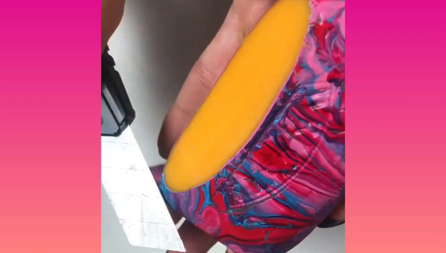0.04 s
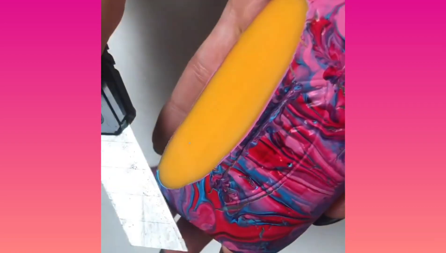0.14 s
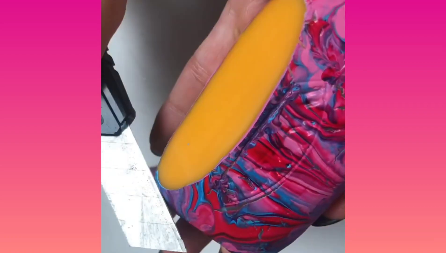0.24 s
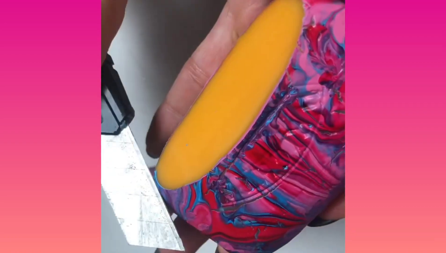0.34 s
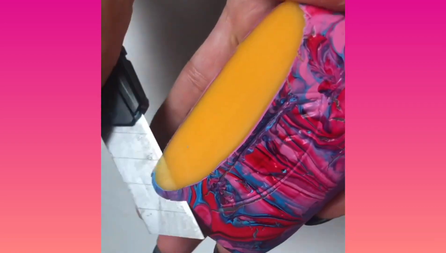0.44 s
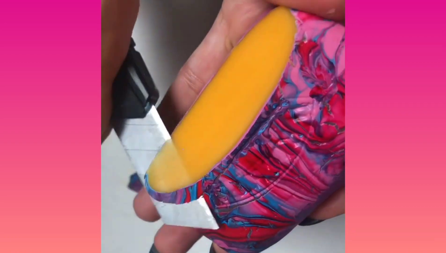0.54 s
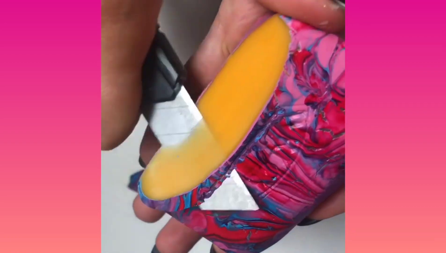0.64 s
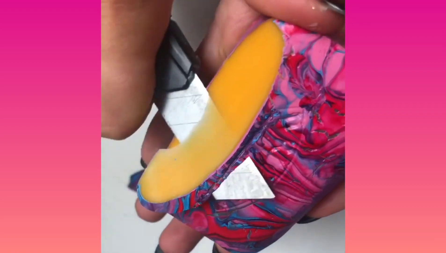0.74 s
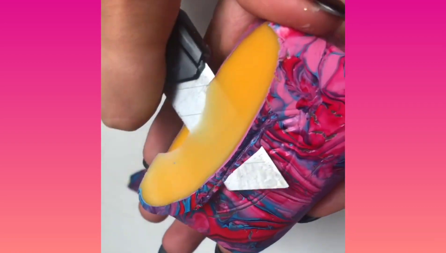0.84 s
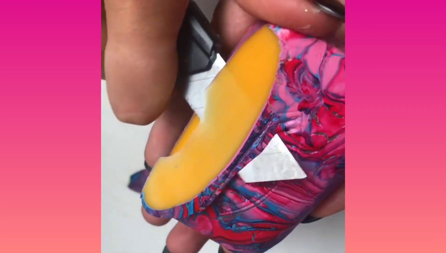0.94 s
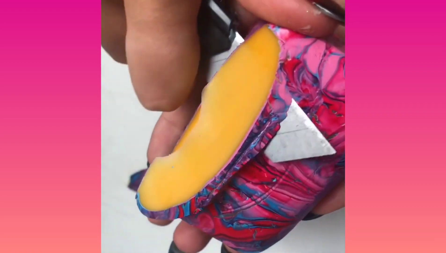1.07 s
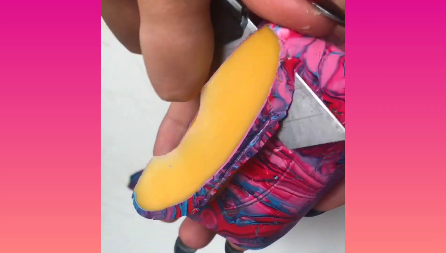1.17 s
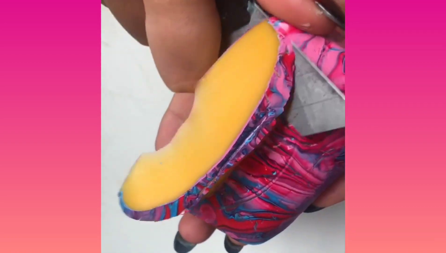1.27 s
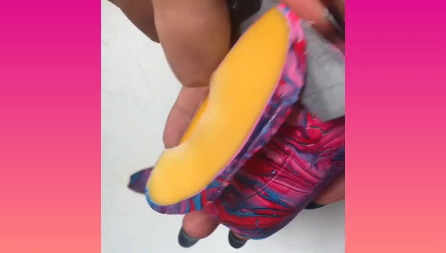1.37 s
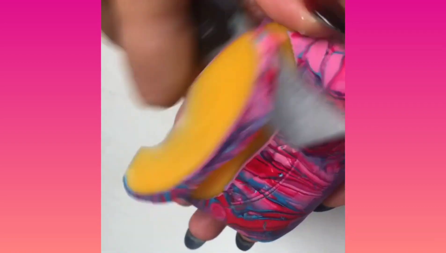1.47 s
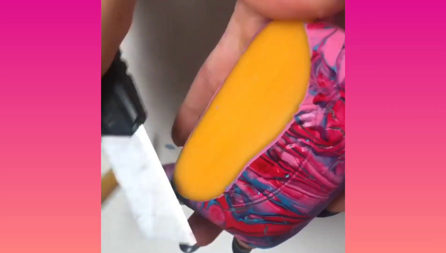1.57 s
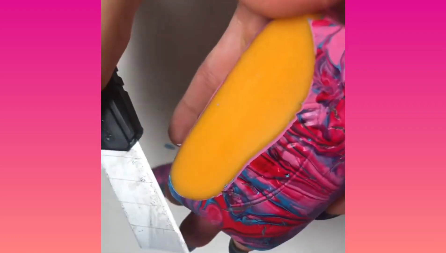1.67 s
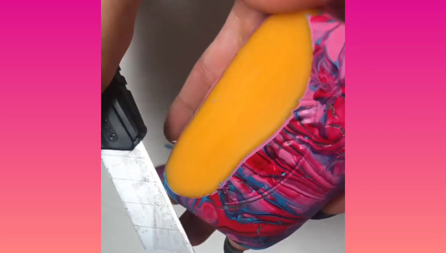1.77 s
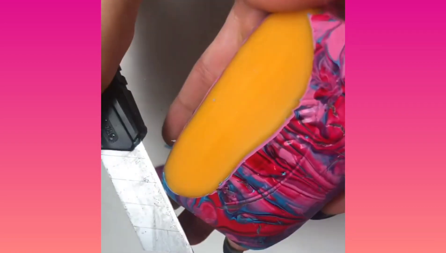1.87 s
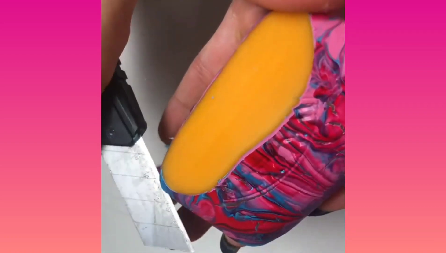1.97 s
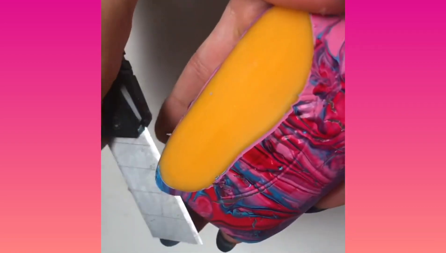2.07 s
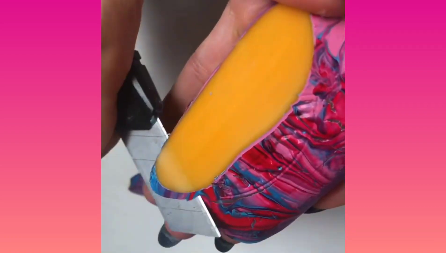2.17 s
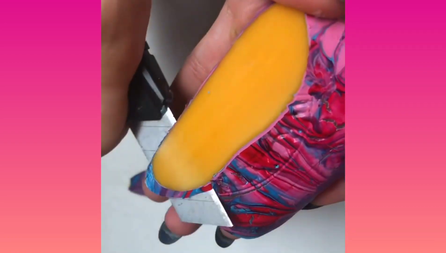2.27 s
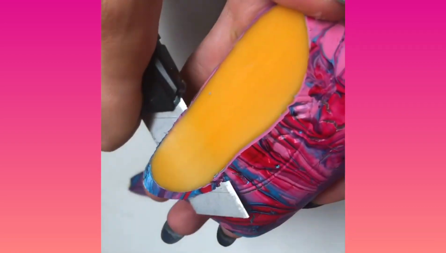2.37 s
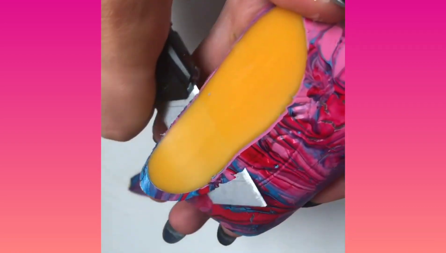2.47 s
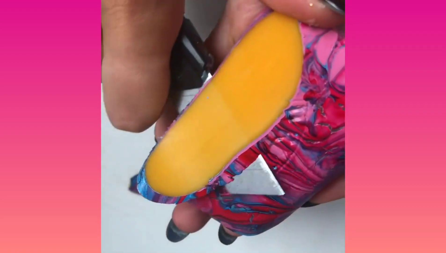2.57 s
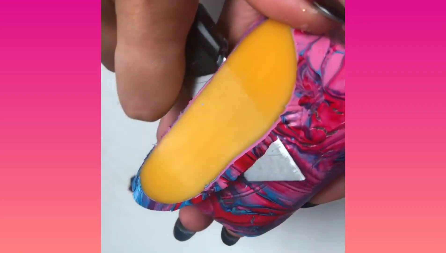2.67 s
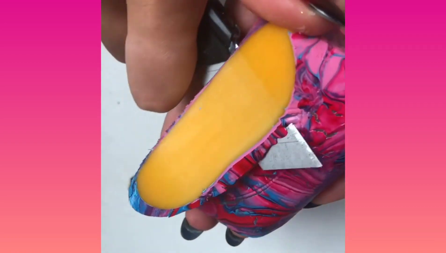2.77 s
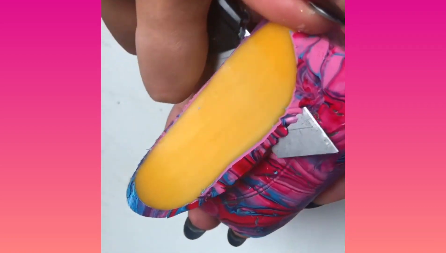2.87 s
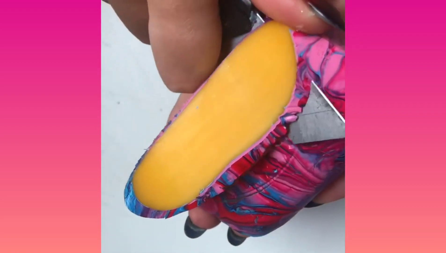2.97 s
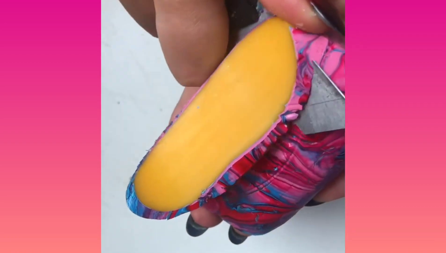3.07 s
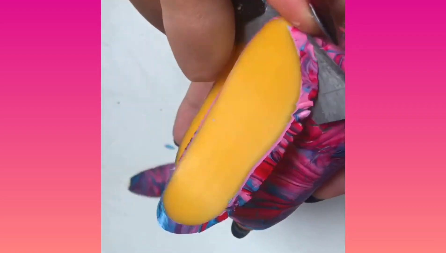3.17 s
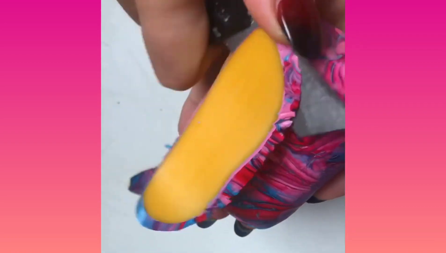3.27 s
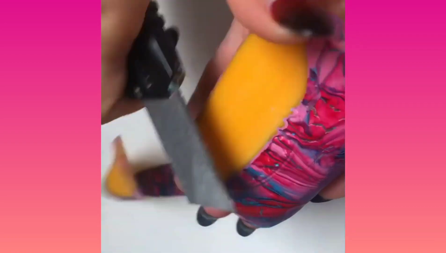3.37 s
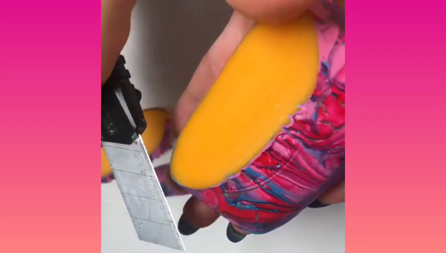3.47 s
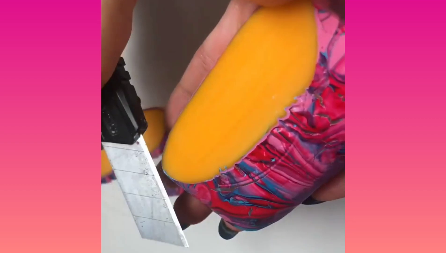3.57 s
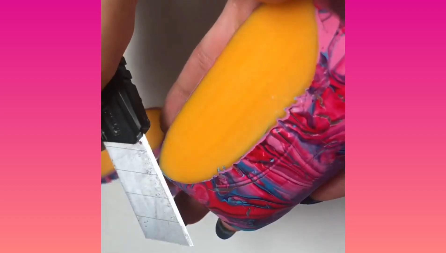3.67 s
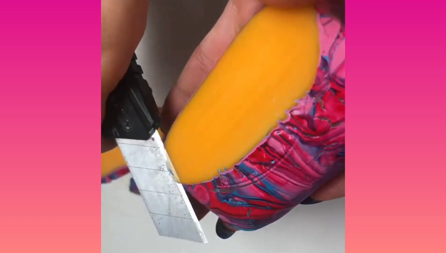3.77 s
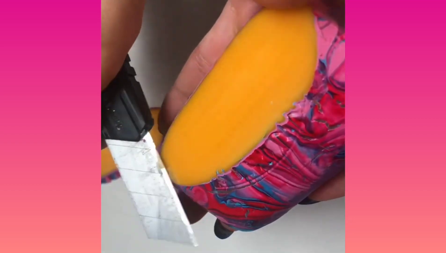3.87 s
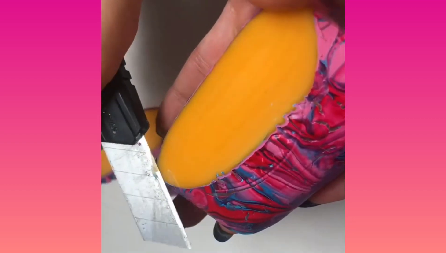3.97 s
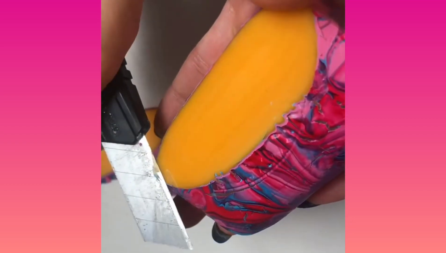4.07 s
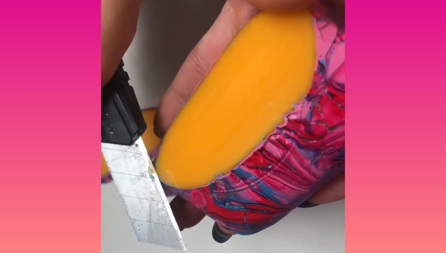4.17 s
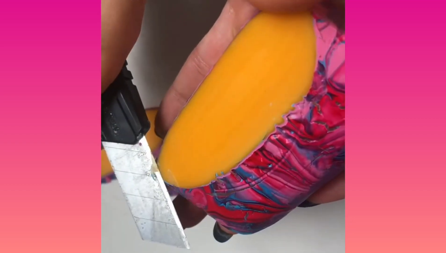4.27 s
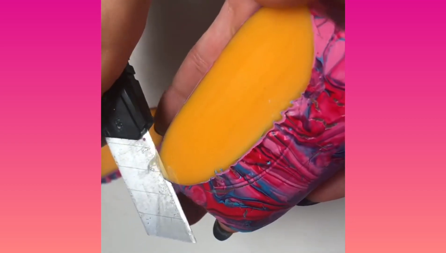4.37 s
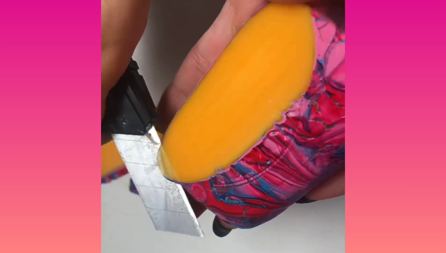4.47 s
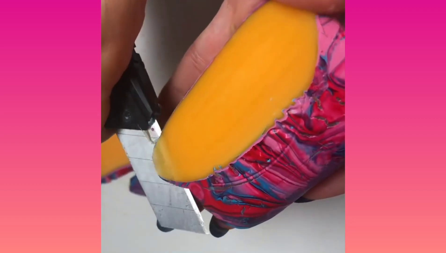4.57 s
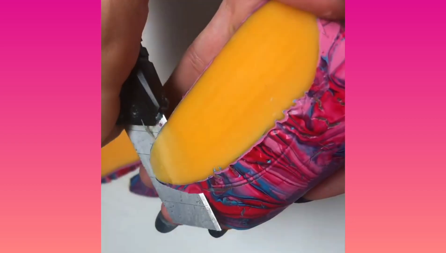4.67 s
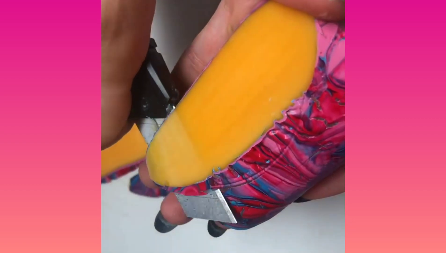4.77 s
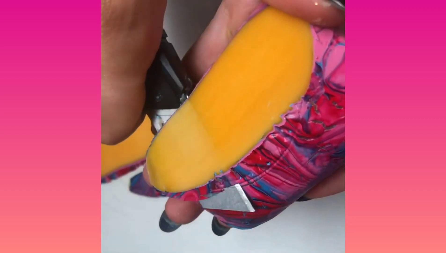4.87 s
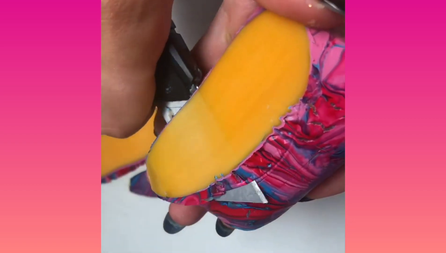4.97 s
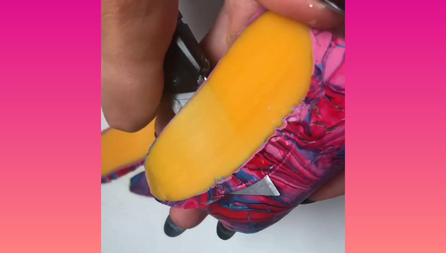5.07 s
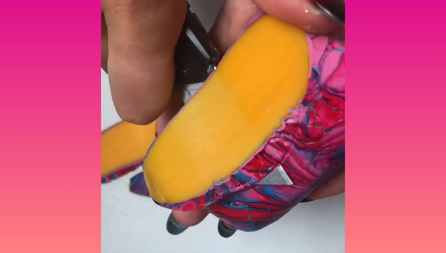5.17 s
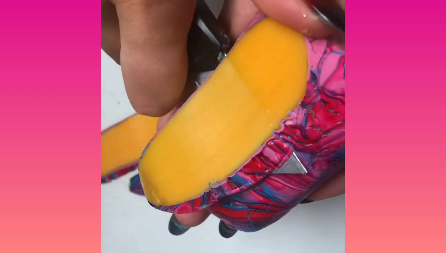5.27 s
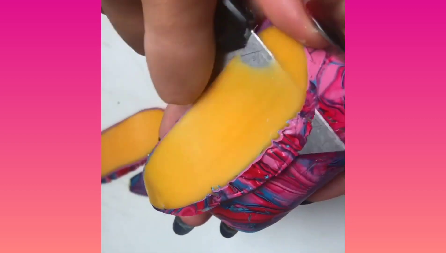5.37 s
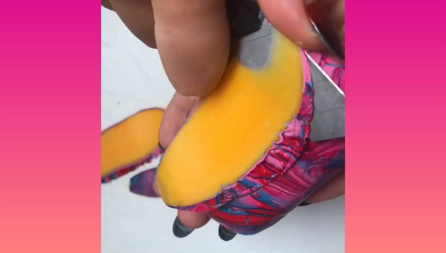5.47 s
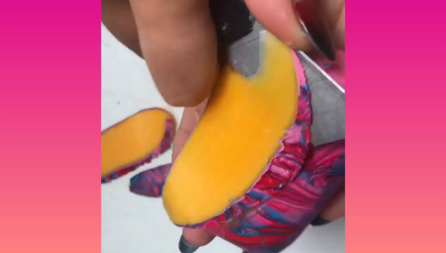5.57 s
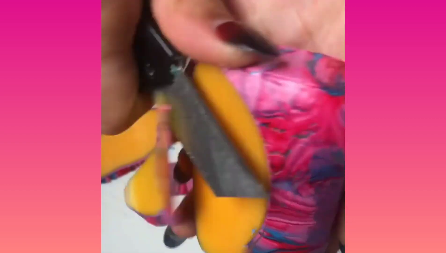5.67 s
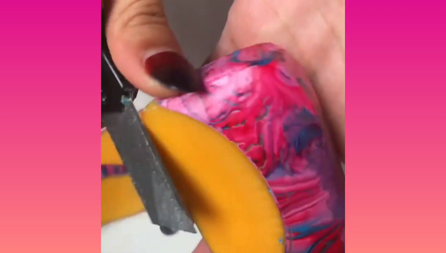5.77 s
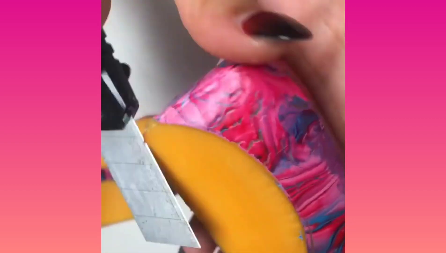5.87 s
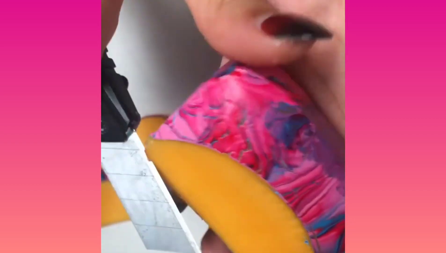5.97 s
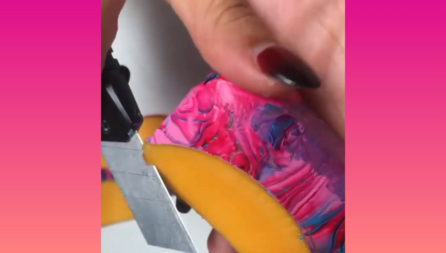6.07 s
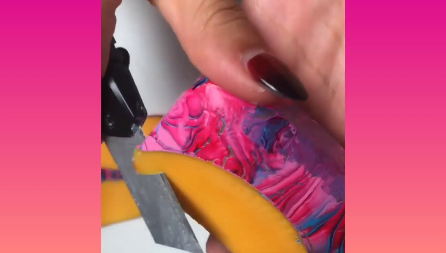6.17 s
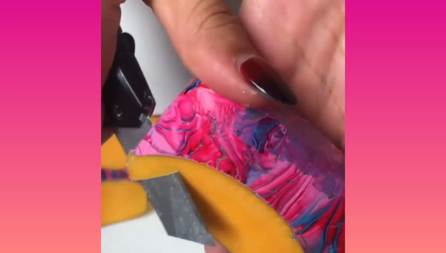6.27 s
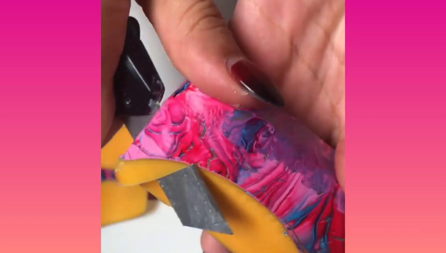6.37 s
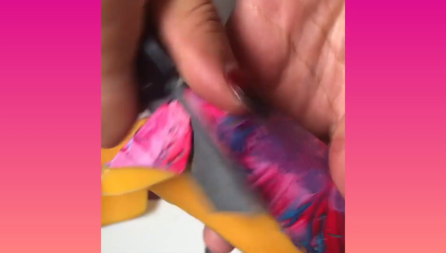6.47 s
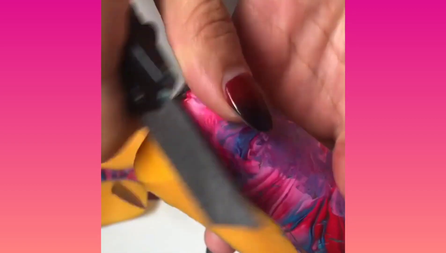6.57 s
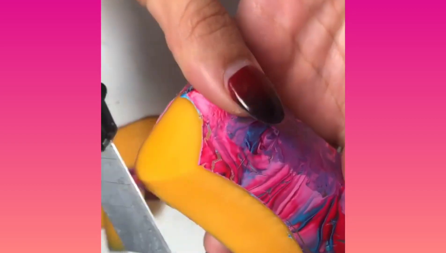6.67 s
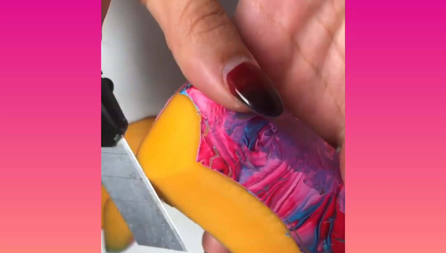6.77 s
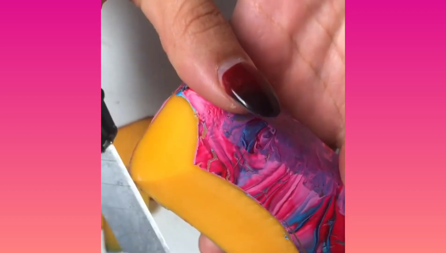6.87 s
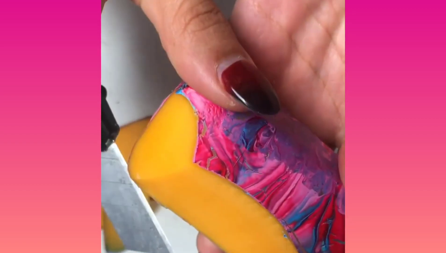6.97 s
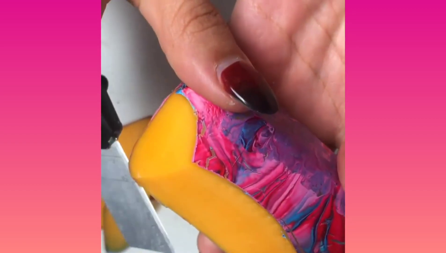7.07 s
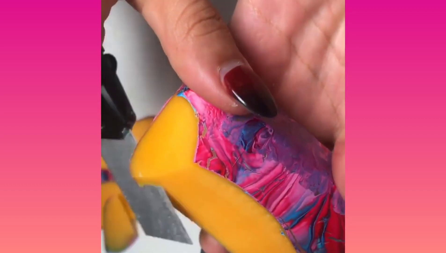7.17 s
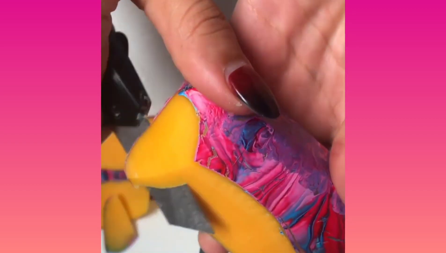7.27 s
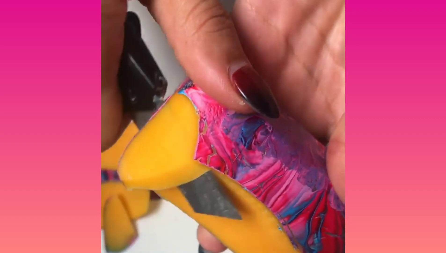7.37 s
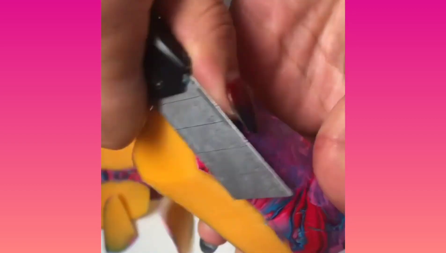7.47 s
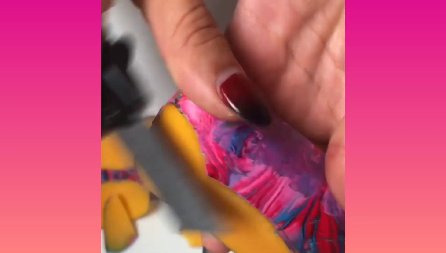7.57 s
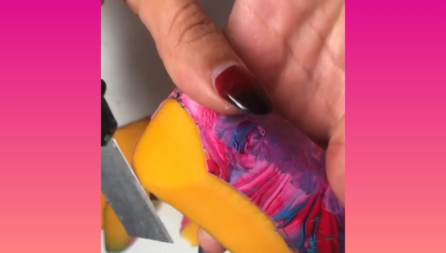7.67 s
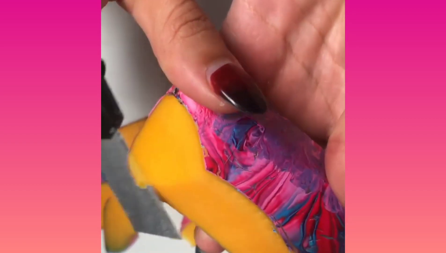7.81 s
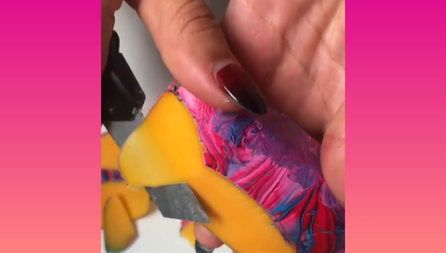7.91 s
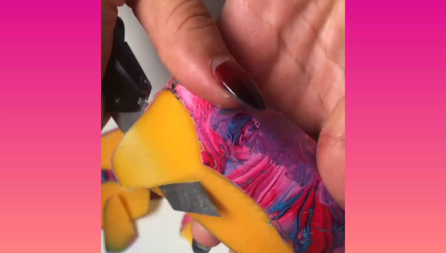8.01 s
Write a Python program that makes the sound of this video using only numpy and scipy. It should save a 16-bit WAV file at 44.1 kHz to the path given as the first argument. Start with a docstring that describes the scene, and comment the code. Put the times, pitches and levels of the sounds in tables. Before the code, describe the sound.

Crisp soap carving heard by a close microphone with slightly dulled top treble. Barely audible shaving hisses lead to sharp brittle cracks, each soon followed by a woody knock or muffled thump and a tiny clatter on the table. The pace is uneven, with near-silent gaps holding only soft air noise, a low wavering hum and rumble.

```python
"""The faint hiss of a snap-off blade shaving soap, close to the microphone in a quiet room.
The hiss is noise from the slipping edge, louder and crumbly where it bites; bursts of tiny breaks make the
soap crack as slices come free. The pieces drop and bounce on the table top, whose bending waves answer
with short falling thuds, and rock in soft bumps. Behind: rumble, a wavering hum, a fading wash and air."""
import sys
import numpy as np
from scipy import signal
from scipy.fft import rfft, irfft, next_fast_len
from scipy.io import wavfile
from scipy.ndimage import uniform_filter1d, map_coordinates

SR = 44100
rng = np.random.default_rng(int(sys.argv[2]) if len(sys.argv) > 2 else 0)


def master_out(mix):
    """Clip the mix to full scale and print it as 16-bit PCM to the path in sys.argv[1]."""
    frames = np.transpose(np.atleast_2d(mix))
    ceiling = np.clip(frames, -1, 1)
    pcm = np.round(ceiling * 32767).astype(np.int16)
    wavfile.write(sys.argv[1], SR, pcm)


N = 354563
TIME = np.arange(N) / SR  # s
HIT = 4096  # samples in one contact
HIT_HZ = np.fft.rfftfreq(HIT, 1 / SR)

# long strokes of the blade through the bar: start_s, end_s, scrape_db
STROKES = [(0.512, 1.34, -75.5), (2.201, 3.25, -77.5), (4.7, 5.7, -80.5)]
# the blade bites harder: peak_s, fall_s (time to fall 10 dB; 0 is silent), scrape_db, crumbling_db
BITES = [(0.525, 0.02, -58, -70), (0.757, 0.03, -55, -58), (1.18, 0.07, -66, -92), (1.44, 0.1, -73.5, -83),
         (1.522, 0.0242, -63, -68), (1.63, 0.05, -67.5, -69), (2.32, 0.18, -73.5, -79),
         (2.69, 0.36, -72.5, -74.5), (3.471, 0.02, -56.5, -58), (3.94, 0.15, -74, -82.5),
         (4.991, 0.1, -70, -69), (5.47, 0.2, -67.5, -72), (5.549, 0.0343, -50, -65),
         (5.635, 0.0868, -61, -68.5), (5.81, 0.27, -72.5, -71), (6.642, 0.09, -62, -72),
         (7.45, 0.16, -74.5, -68.5), (7.585, 0, -51.5, -74), (8.015, 0.04, -69.5, -64)]
# spectrum of crumbs crackling off the edge: pitch_hz, relative level_db (per Hz)
CRUMBLE = [(600, -10.5), (1800, -4), (5000, -5), (7300, 1), (9200, 3), (10300, -2), (12000, -8.5)]
STROKE_EDGE_S = 0.053  # the blade eases in and out
ENTRY_HZ, EXIT_HZ = 3860, 4300  # the scrape's resonance climbs as the slice comes loose
CLIMB_CURVE = 0.45  # below 1: it climbs fastest early in the stroke


def shaving():
    """The edge sticks and slips through the wax; where it bites, fine crumbs crackle off it."""
    catches = np.abs(wobble(260))  # brief catches of the edge make the hiss grainy
    grip = unit(amp(5 * catches + 1.6 * wobble(60) + 0.8 * wobble(14)))
    scraping, crumbling, depth = np.zeros((3, N))
    for start, end, scrape_db in STROKES:
        inside = np.clip(np.minimum(TIME - start, end - TIME) / STROKE_EDGE_S, 0, 1)
        scraping += amp(scrape_db) * inside
        depth = np.where(inside > 0, (TIME - start) / (end - start), depth)
    for peak, fall, scrape_db, crumbling_db in BITES:
        bite = swell(peak, fall)
        scraping = np.hypot(scraping, amp(scrape_db) * bite)
        crumbling = np.hypot(crumbling, amp(crumbling_db) * bite)
    # the climb is a crossfade between two resonances
    depth = np.clip(depth, 0, 1) ** CLIMB_CURVE
    hiss = np.sqrt(1 - depth) * scrape(ENTRY_HZ) + np.sqrt(depth) * scrape(EXIT_HZ)
    spiky_noise = rng.standard_normal(N) * amp(6.0 * rng.standard_normal(N))
    crumbs = unit(coloured(spiky_noise, CRUMBLE))
    return grip * (scraping * hiss + crumbling * crumbs)


# spectrum of the scrape with its resonance at 4300 Hz: pitch_hz, relative level_db (per Hz)
SCRAPE = [(1500, -15), (2500, -11.5), (3300, -14.5), (3800, -5.5), (4300, -1), (4800, -4.5), (5500, -16),
          (6200, -13.5), (7200, -18.5), (11000, -20)]


def scrape(resonance_hz):
    """Slips of the edge, heard through the resonance of the slice."""
    slips = rng.standard_normal(N) * amp(3.39 * rng.standard_normal(N))
    shifted = [(hz * resonance_hz / 4300, db) for hz, db in SCRAPE]
    return unit(coloured(slips, shifted))


# soap cracking at the blade: start_s, snap_db (relative), body_db (over the snap), build_up_s
CRACKS = [(0.299, -26.5, 5.5, 0.0029), (0.509, -16.5, -5.5, 0.0028), (1.1318, -15, -16, 0.00085),
          (1.5127, -8.5, -14, 0.0032), (1.616, -19, -3.5, 0.0043), (2.584, -23.5, -21, 0.0015),
          (2.825, -23, -12, .001), (2.978, -15, -12.5, 0.00097), (3.293, -7.5, -14.5, 0.00081),
          (3.443, -10.5, -2.5, 0.00087), (3.4592, 2, -10.5, .0016), (3.488, -5, 1.5, 0.0013),
          (3.829, -13, -6, 0.006), (4.2956, -22, -2, .0011), (4.3832, -24, -9, .0012),
          (5.526, -9.5, -3, .0015), (5.752, -22.5, -6, .001), (5.768, -21, -3.5, 0.00077),
          (5.806, -18, 0, 0.012), (5.848, -21, -4.5, 0.00054), (6.6563, -5, -12.5, 0.0042),
          (6.694, -14.5, 3, .0012), (7.5227, -21.5, 6, .0015), (7.596, 3, -5.5, 0.01)]


def cracks():
    """The soap splits ahead of the edge in short bright snaps."""
    track = np.zeros(N)
    for start, snap_db, body_over_db, build_up in CRACKS:
        add(track, start - 2 * build_up, snap(snap_db, body_over_db, build_up))
    return track


CRACK_FIZZ_DB = -4.5  # the top of the snap, relative to its middle
CRACK_T60_S, T60_DOUBLES_DB = 0.02, 13.5  # cracks with more body last longer
T60_PER_BUILD_UP = 2  # a crack that builds slowly also dies slowly


def snap(snap_db, body_over_db, build_up):
    """One split of the soap, a dying burst of tiny breaks with its room tail."""
    body_db = snap_db + body_over_db
    fizz_db = snap_db + CRACK_FIZZ_DB
    colour = [(150, body_db - 16), (500, body_db - 6), (900, body_db - 3.5), (2000, body_db),
              (4300, snap_db - 1), (7200, fizz_db - 3.5), (11000, fizz_db)]
    t60 = CRACK_T60_S * 2 ** (body_over_db / T60_DOUBLES_DB) + T60_PER_BUILD_UP * build_up
    burst = fracture(colour, build_up, t60, spiky_db=2)
    return in_room(amp(-2) * burst, wet_db=-24.5)


# resonances of blade and bar, in every fracture: pitch_hz, width_hz, boost_db
BLADE = [(2670, 160, 3.5), (3803, 260, 4.5), (6493, 330, 7), (7960, 350, 4), (9150, 600, 3.5)]


def fracture(colour, build_up, t60, spiky_db):
    """A burst of tiny breaks, in clumps, that builds up for two build-up times and then dies away."""
    t = np.arange(HIT) / SR - 2 * build_up
    shape = amp(np.where(t < 0, 20 * t / build_up, -60 * t / t60))
    clumps = unit(uniform_filter1d(rng.standard_normal(HIT), size=16))
    spikes = amp(spiky_db * rng.standard_normal(HIT) + 3 * clumps)
    breaks = rfft(shape * rng.standard_normal(HIT) * spikes)
    # even across broad bands, ragged within them
    breaks = breaks / np.sqrt(uniform_filter1d(np.abs(breaks) ** 2, size=400))
    return irfft(breaks * causal(along(colour, HIT_HZ) + resonances(BLADE)))


# single crumbs breaking off: start_s, snap_db (relative)
TICKS = [(1.544, -23), (2.306, -32), (4.046, -25), (4.789, -30.5), (6.116, -31), (6.481, -29), (7.343, -35),
         (7.919, -23.5)]
TICK_BODY_DB, TICK_BUILD_UP_S = -9, 0.00046  # ticks are thin and sudden


def ticks():
    """Single crumbs break off with tiny snaps."""
    track = np.zeros(N)
    for start, snap_db in TICKS:
        add(track, start - 2 * TICK_BUILD_UP_S, snap(snap_db, TICK_BODY_DB, TICK_BUILD_UP_S))
    return track


# soap landing on the table: start_s, thump_db, knock_db, crunch_db (all relative)
LANDINGS = [(0.024, 10.5, 1, -25), (0.116, -4, -27.5, -48), (1.648, -12, -11.5, -27.5),
            (1.7582, 13.5, 26.5, -9), (1.794, -11, -10, -15.5), (1.801, -13, -2, -23),
            (3.5584, 9.5, 4, -2.5), (3.59, 17, 8.5, -12.5), (3.603, 9.5, 10.5, -5.5),
            (3.632, 5.5, -3, -13.5), (5.908, -3.5, 1.5, -21), (5.9111, 20.5, 1, 0.5),
            (5.983, 4.5, -9.5, -16.5), (6.0216, 2.5, 0, -23.5), (6.783, 0, -4, -15.5),
            (6.8145, -10, -2, -2.5), (6.822, 0.5, 3, -15), (6.841, -1.5, 6, -23), (6.8901, -8, -4, -9),
            (7.69, 0, -0.5, -10), (7.7061, 8.5, 15, 2.5), (7.709, 11, 12.5, 2), (7.76, -4.5, -2, -17),
            (7.7691, 10, 14.5, 9)]
FIZZ_DB, FIZZ_GROWS = -3.5, 1.2  # the top of the crunch grows faster than the rest
# the clack grows with both knock and crunch (dB per dB)
CLACK_DB, CLACK_GROWS, CLACK_FOLLOWS_CRUNCH = -9, 0.92, 0.33


def landings():
    """Each piece hits the table with a thud while its brittle edge crunches."""
    track = np.zeros(N)
    for start, thump_db, knock_db, crunch_db in LANDINGS:
        clack_db = CLACK_GROWS * knock_db + CLACK_FOLLOWS_CRUNCH * crunch_db + CLACK_DB
        fizz_db = FIZZ_GROWS * crunch_db + FIZZ_DB
        travel = 0.0011 * np.exp(0.1 * rng.standard_normal())  # s
        blow = thud(thump_db, knock_db, clack_db, travel)
        colour = [(500, crunch_db - 17.5), (2000, crunch_db - 6.0), (4300, crunch_db - 4.0),
                  (7200, fizz_db - 2.5), (11000, fizz_db - 2.5)]
        crunch = fracture(colour, build_up=0.0001, t60=0.014, spiky_db=12)
        add(track, start - 0.0004, in_room(blow, wet_db=-21.5))
        add(track, start - 0.0003, in_room(crunch, wet_db=-24.0))
    return track


# resonances of the table top: pitch_hz, width_hz, boost_db
TABLE_TOP = [(227, 160, 1.5), (573.2, 28, -3.5), (1500, 150, 4.5), (2674, 120, 7.5)]


def thud(thump_db, knock_db, clack_db, travel):
    """A blow on the table top: bending waves carry the highs first, so the thud falls in pitch."""
    colour = [(30, thump_db - 33.5), (80, thump_db - 15.0), (155, thump_db - 11.0),
              (240, thump_db), (450, thump_db), (600, (thump_db + knock_db) / 2 - 11.5),
              (830, knock_db + 1), (1200, knock_db - 11.5),
              (1550, clack_db + 1.5), (2700, clack_db - 10), (4500, clack_db - 27), (9000, clack_db - 55)]
    dispersion = np.exp(-4j * np.pi * travel * np.sqrt(HIT_HZ * 1e3))  # travel = delay at 1 kHz
    return irfft(causal(along(colour, HIT_HZ) + resonances(TABLE_TOP)) * dispersion)


# a fallen piece rocking to rest: start_s, length_s, level_db (0.43 of the way through)
SETTLING = [(-0.012, 0.17, -51), (1.738, 0.12, -45), (3.586, .095, -44.5), (5.903, 0.14, -47.5),
            (6.828, 0.12, -50), (7.695, 0.045, -39.5)]
# spectrum of the bumps: pitch_hz, relative level_db (per Hz)
ROCKING = [(30, -23), (80, 2.5), (160, 1), (300, 0.5), (600, -13.5), (900, -15.5), (1600, -26.5),
           (4000, -37.5)]
ROCK_ATTACK_S, ROCK_FADE_DB = 0.012, 15.5  # the bumps start quickly and weaken until the piece lies still


def settling():
    """A slice rocks on its face in quick soft bumps before it lies still."""
    track = np.zeros(N)
    bumps = unit(coloured(rng.standard_normal(N) * amp(2.9 * wobble(130)), ROCKING))
    for start, length, level_db in SETTLING:
        progress = np.clip((TIME - start) / length, 0, 1)
        edges = np.clip(np.minimum(TIME - start, start + length - TIME) / ROCK_ATTACK_S, 0, 1)
        track += amp(level_db + ROCK_FADE_DB * (0.43 - progress)) * edges * bumps
    return track


# a faint narrow rubbing sound between cuts: peak_s, fall_s (time to fall 10 dB), level_db
RUBS = [(3.86, 0.2, -79.5), (6.98, 0.2, -80)]
# spectrum of the rub: pitch_hz, relative level_db (per Hz)
RUB_COLOUR = [(2200, -38), (2600, -1), (2750, 13.5), (2950, -12), (3400, -16)]


def rubbing():
    """A faint narrow band of noise, the rub while the hand takes a new hold."""
    level = sum(amp(level_db) * swell(peak, fall) for peak, fall, level_db in RUBS)
    return level * unit(coloured(rng.standard_normal(N), RUB_COLOUR))


# spectra of rumble, midrange wash and air noise: pitch_hz, relative level_db
RUMBLE_COLOUR = [(18, -25), (35, -9), (55, -1), (80, -10.5), (110, 4.5), (145, -9.5), (200, -22),
                 (600, -59.5)]
WASH_COLOUR = [(200, -40.5), (550, -7), (900, 6.5), (1200, -6.5), (1550, -1), (3000, -19.5), (7000, -39)]
AIR_COLOUR = [(60, -16), (150, 3.5), (260, 1.5), (400, -5), (620, -7), (900, -11), (1500, -16),
              (3000, -23.5), (12000, -39.5)]
# the rumble swells early on, the hum once; each width is the time to fall 10 dB
RUMBLE_FLOOR_DB, RUMBLE_SWELL_S, RUMBLE_SWELL_WIDTH_S, RUMBLE_SWELL_DB = -68.5, 0.7, 0.9, -60
HUM_HZ, HUM_DB, HUM_SWELL_S, HUM_SWELL_WIDTH_S, HUM_SWELL_DB = 108, -76, 0.94, 0.26, -57.5
WASH_DB, WASH_FADE_DB_PER_S = -70, 6.5  # starting level and fade


def room_tone():
    """A low rumble with a wavering hum and a fading midrange wash, under soft air noise and an even hiss."""
    rumble_swell = amp(RUMBLE_SWELL_DB) * swell(RUMBLE_SWELL_S, RUMBLE_SWELL_WIDTH_S)
    rumble_gain = np.hypot(amp(RUMBLE_FLOOR_DB), rumble_swell) * amp(1.2 * wobble(9.6))
    rumble = rumble_gain * unit(coloured(rng.standard_normal(N), RUMBLE_COLOUR))
    hum_gain = amp(HUM_DB) + amp(HUM_SWELL_DB) * swell(HUM_SWELL_S, HUM_SWELL_WIDTH_S)
    hum_phase = 2 * np.pi * np.cumsum(HUM_HZ + 6 * wobble(12)) / SR
    hum = hum_gain * amp(2.5 * wobble(4.9)) * np.sin(hum_phase)
    wash_gain = amp(WASH_DB - WASH_FADE_DB_PER_S * TIME)
    wash = wash_gain * unit(coloured(rng.standard_normal(N), WASH_COLOUR))
    air = amp(-69.5) * unit(coloured(rng.standard_normal(N), AIR_COLOUR))
    hiss = amp(-75.0) * rng.standard_normal(N)
    return rumble + hum + wash + air + hiss


# decay of the room: pitch_hz, t60_s
ROOM = [(100, 0.32), (400, 0.086), (1500, 0.071), (5000, 0.073), (11000, .07)]


def in_room(x, wet_db):
    """A contact followed by its own short room tail, noise that decays at each pitch's own rate."""
    hz, t, z = signal.stft(rng.standard_normal(SR // 4), SR, nperseg=256)
    decay = amp(-60 * t / along(ROOM, hz)[:, None])
    tail = signal.istft(z * decay, SR, nperseg=256)[1]
    tail = np.pad(tail, (SR // 250, 0))  # the tail starts 4 ms late
    response = amp(wet_db) * tail / np.linalg.norm(tail)
    response[0] = 1  # direct sound
    release = np.minimum(2 - 2 * np.arange(HIT) / HIT, 1) ** 2  # the contact ends in silence
    return signal.fftconvolve(x * release, response)


def amp(db):
    """Decibels to gain."""
    return 10 ** (np.asarray(db) / 20)


def unit(x):
    """Scale to rms 1."""
    return x / np.sqrt(np.mean(x ** 2) + 1e-20)


def along(points, hz):
    """Read (Hz, value) points on a log axis."""
    f, v = np.transpose(points)
    return np.interp(np.log(hz + 1), np.log(f + 1), v)


def wobble(rate):
    """A smooth random curve, rate knots a second."""
    knots = rng.standard_normal(int(N * rate / SR) + 4)
    return map_coordinates(knots, [TIME * rate])


def swell(peak, fall):
    """A peak that is 10 dB down at fall seconds to either side."""
    roundness = 1.35  # 1 is a pointed peak, 2 a bell
    return amp(-10 * np.abs((TIME - peak) / fall) ** roundness)


def coloured(x, points):
    """x shaped by a (Hz, dB) spectrum."""
    m = next_fast_len(N + 8192)
    gain = amp(along(points, np.fft.rfftfreq(m, 1 / SR)))
    return irfft(rfft(x, m) * gain, m)[:N]


def causal(db):
    """The response with this gain that starts only at the blow (minimum phase)."""
    cepstrum = irfft(np.log(amp(db) + 1e-6))
    cepstrum[1:HIT // 2] *= 2
    cepstrum[HIT // 2 + 1:] = 0
    return np.exp(rfft(cepstrum))


def resonances(rows):
    """Gain in dB of a set of (Hz, width Hz, dB) resonances."""
    return sum(db / (1 + (2 * (HIT_HZ - hz) / width) ** 2) for hz, width, db in rows)


def add(track, s, sound):
    """Mix a sound into the track at time s."""
    start = max(round(s * SR), 0)
    track[start:start + len(sound)] += sound[:max(N - start, 0)]


def scene():
    """Blade, soap and table in the room."""
    soap = shaving() + cracks() + ticks()
    table = landings() + settling()
    return (soap + table + rubbing() + room_tone())[None]


def record(dry):
    """The microphone's treble rolls off steeply at the band limit."""
    band = [(10300, 0), (11200, -6), (12200, -28), (12600, -60), (13200, -90)]  # Hz, dB
    return coloured(dry[0], band)[None]


dry = scene()
out = record(dry)
master_out(out)
```